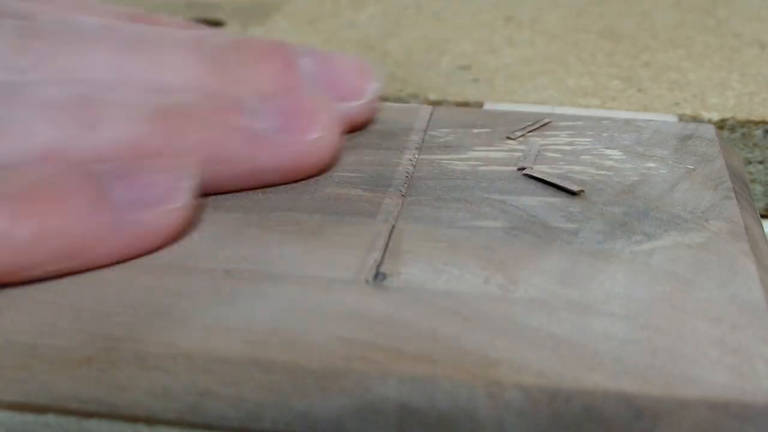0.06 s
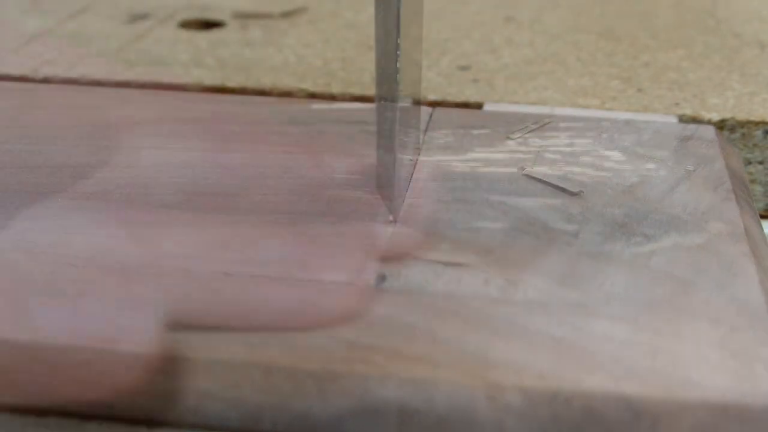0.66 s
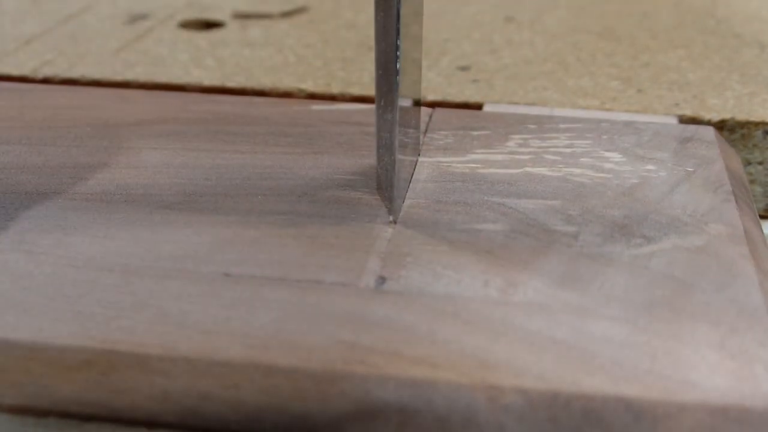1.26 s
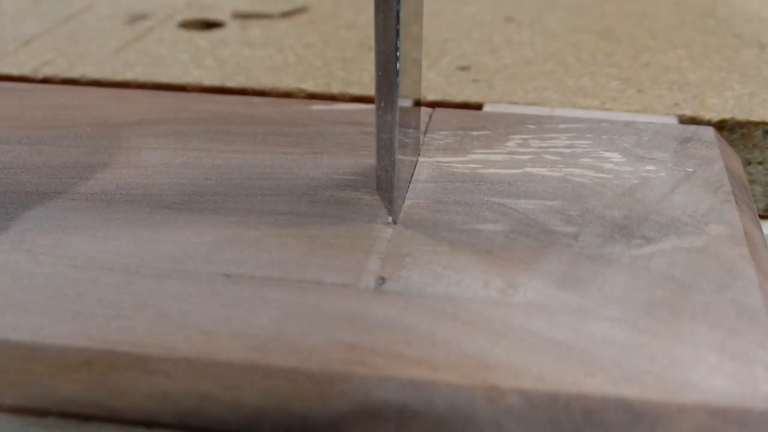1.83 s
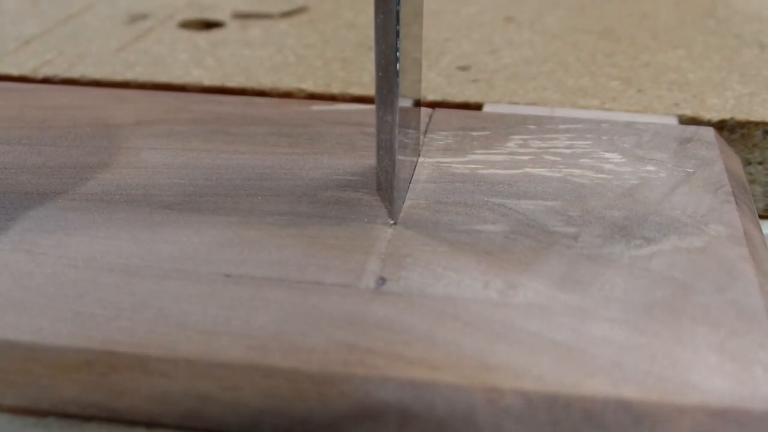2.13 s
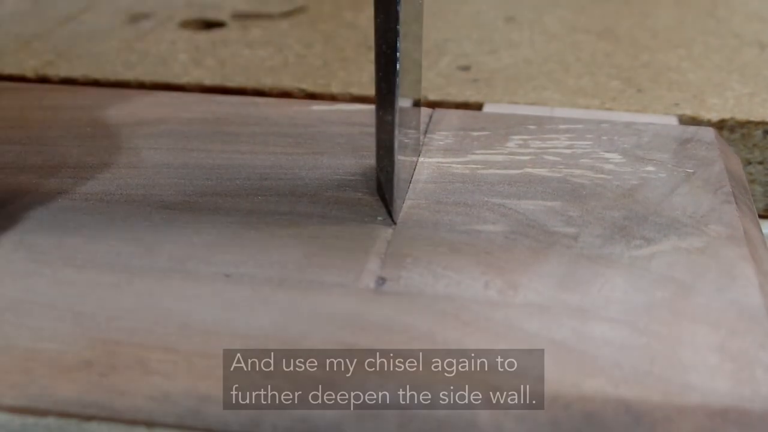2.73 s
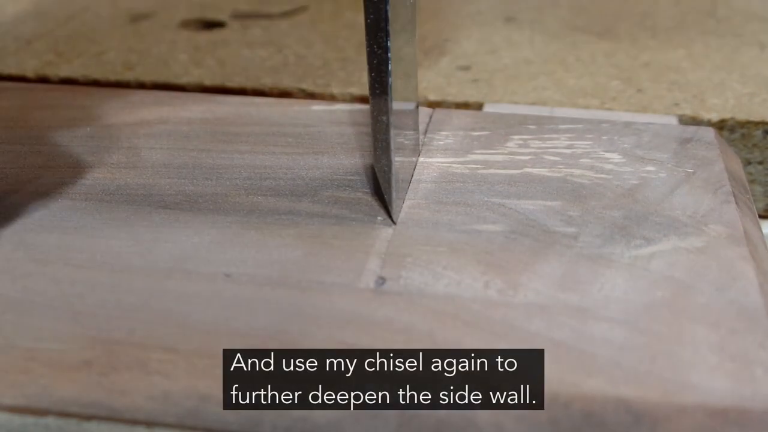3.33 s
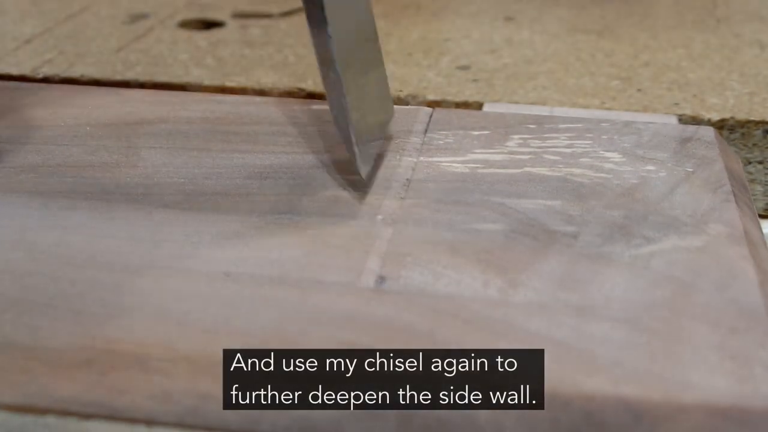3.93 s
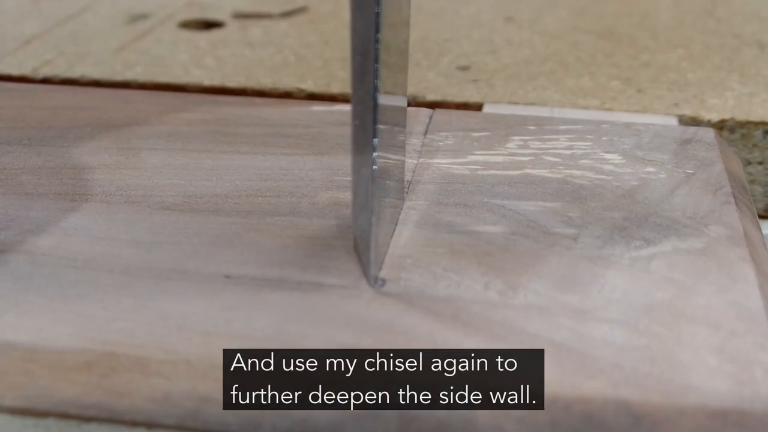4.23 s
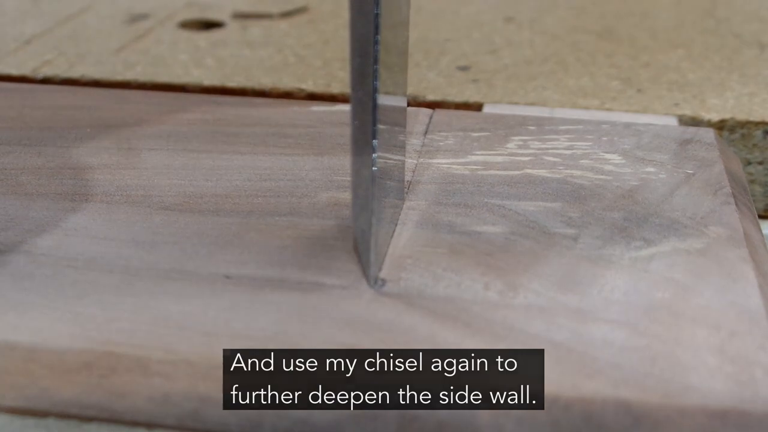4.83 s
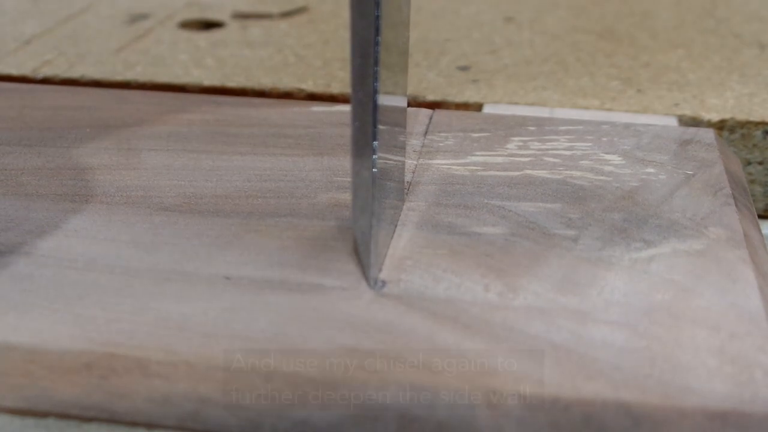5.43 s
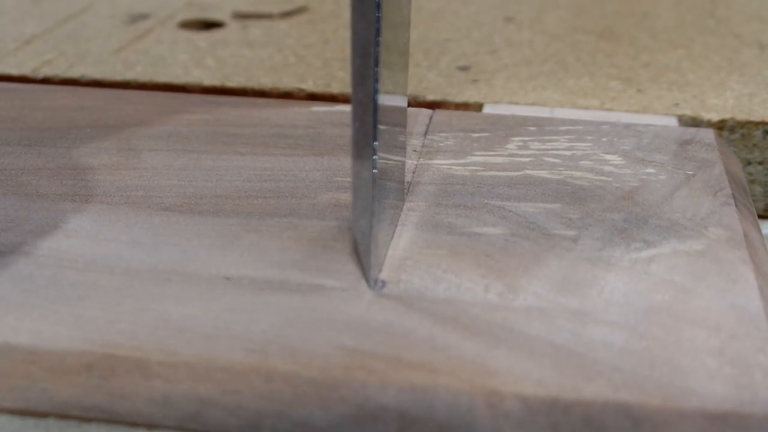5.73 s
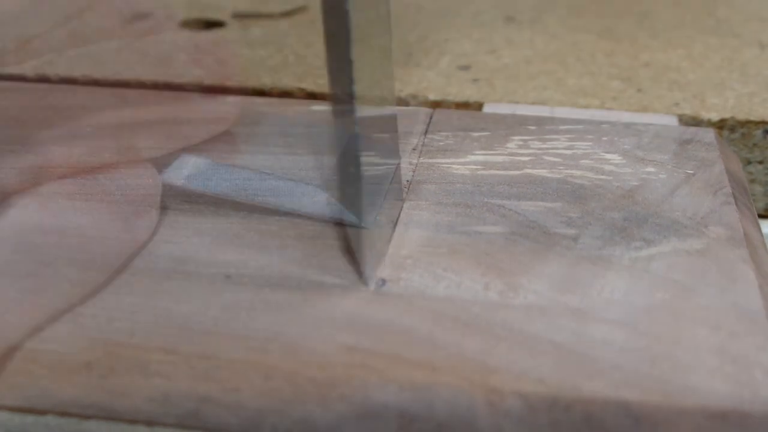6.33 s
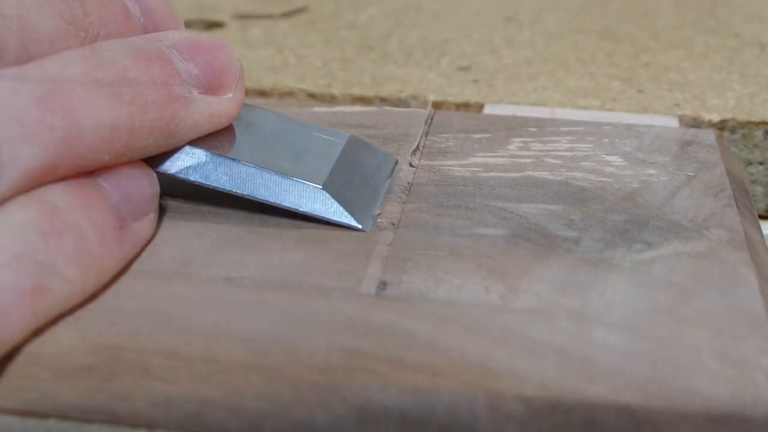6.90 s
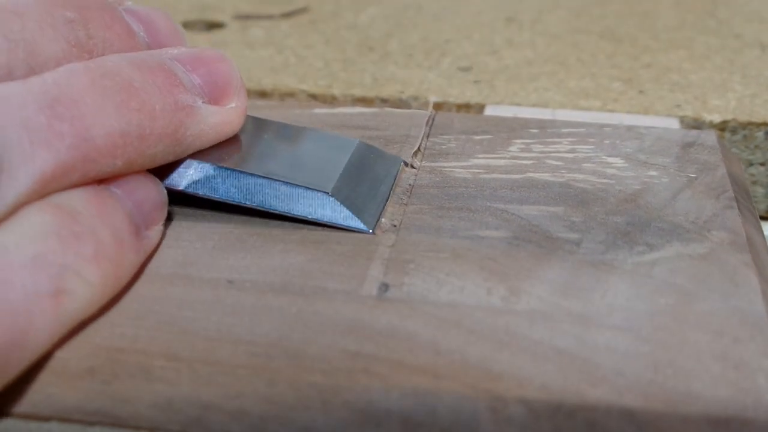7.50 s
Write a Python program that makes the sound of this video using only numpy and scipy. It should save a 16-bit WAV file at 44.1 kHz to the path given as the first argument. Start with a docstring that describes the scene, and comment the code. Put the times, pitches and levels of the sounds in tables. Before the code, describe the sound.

A hand brushes chips off a wooden board with a fine hiss. A mallet then drives a steel chisel in two quick runs of taps, each a woody thump and crack with a thin metallic ring. Between the runs come dull tool knocks and one sharper tap. Finally the edge pares the cut with a few crisp snaps. The microphone is close, in a small, quiet workshop.

```python
"""A hand brushes chips off a board with a fine hiss, close to one microphone in a small, quiet workshop.
Then a mallet drives a steel chisel in two quick runs of taps: the board thumps, the edge cracks, the
blade rings thinly, and the hardest taps overload the recorder. Tools knock dully on the wood, fibres
rustle as the blade is rocked free, and the edge pares the cut with small snaps. Behind it all, faint
room tone fades in and out."""
import sys
import numpy as np
from scipy import signal
from scipy.fft import rfft, irfft, next_fast_len
from scipy.io import wavfile

SR = 44100
rng = np.random.default_rng(int(sys.argv[2]) if len(sys.argv) > 2 else 0)


def persist_wave(psi):
    """Save psi, clipped to +-1, as 16-bit WAV."""
    counts = np.round(np.clip(psi, -1, 1) * 32767).astype(np.int16)
    wavfile.write(sys.argv[1], SR, np.atleast_2d(counts).T)


N = 337795
T = np.arange(int(.8 * SR)) / SR  # time since a contact [s]

# mallet taps, close up, and at 3.27 s a tool knocking the bench with the blade barely ringing: (time [s], level
# [dB], push [dB], brightness [dB], steel ring [dB])
MALLET_TAPS = [(1.051, 7.5, 1.5, -3, -5.5), (1.2777, 1.5, 5.5, -6, -6.5), (1.5313, 1.5, 6.5, -2.5, 3.5),
               (1.7735, 0.5, 5.5, -1.5, 4), (2.0167, -1, 3, 1, -3), (2.265, -1, 1, -1.5, 0.5),
               (3.2662, -2, -2, 5, -35), (4.4816, 1.5, 7.5, -4.5, -4), (4.717, -2, 9.5, 1, 5.5),
               (4.9497, -1.5, 2, -1.5, -3.5), (5.1577, -1, -0.5, -2.5, -0.5), (5.3874, -0.5, -1, -4, 0),
               (5.6094, -2, 1, -3, 1.5), (5.8391, -3.5, 3, -2.5, 0.5)]
# modes of the struck board and mallet: (frequency [Hz], level [dB], t60 [s])
BOARD_MODES = [(94.7, -21.5, 0.32), (134, -25.5, .1), (203, -23.5, 0.4), (260, -26.5, 0.39),
               (281.6, -14, 0.15), (312, -25, 0.43), (391, -21.5, 0.067), (472, -18.5, 0.15),
               (560, -16, 0.051), (823.6, -17, 0.15), (1003, 7.5, 0.0096), (1140, -13, 0.061),
               (1310, -14.5, 0.067), (1523, -18.5, 0.081), (1840, -17.5, 0.02), (2110, -20.5, 0.018),
               (2396, -5, 0.017), (2540, -15, 0.012), (3420, -7.5, 0.012)]
# surfaces near the microphone: (delay [s], level [dB])
NEAR_ECHOES = [(.011, -18.5), (0.013, -26)]

def mallet():
    """Each tap is a heavy push into the board, a crack at the edge and a thin ring of the blade."""
    out = np.zeros(N)
    crack_spectrum = [(1000, -11), (2300, 12.5), (3000, -2), (3700, 1.5), (8000, -16.5), (15000, -17)]
    thump_db = -3.5
    shared_tail = aftersound(bench_db=-17, room_db=-30.5)  # the same bench and walls answer every tap
    for s, db, push_db, bright_db, ring_db in MALLET_TAPS:
        board = ring(BOARD_MODES, scatter_db=1.5, detune=.007)
        push = -amp(push_db - 11.5) * low_cut(board, hz=170)
        crack = amp(-11) * fade(t60=.007) * hiss(crack_spectrum, size=len(T))
        tail = shared_tail + aftersound(bench_db=-15, room_db=-27.5)
        wood = push + treble_ripple(crack + tail, ripple_db=3.2)
        for delay, echo_db in NEAR_ECHOES:
            add(wood, delay, amp(echo_db) * (push + crack))
        top_db = 3 + .97 * bright_db + .28 * ring_db  # bright, ringing taps have more top treble
        tone = [(280, thump_db), (600, .001), (1150, .002),
                (1800, bright_db), (4000, bright_db), (6500, top_db)]
        add(out, s, amp(db) * colour(low_cut(wood, hz=85), tone))
        add(out, s + .00083, amp(db + ring_db - 21) * blade_ring())  # free to ring once the mallet lifts
    return out


# modes of the steel chisel: (frequency [Hz], level [dB], t60 [s])
BLADE_MODES = [(2740, -22, .08), (3790, -6, .04), (5830, -11, .04), (5960, -11, .045), (6500, -22, .04),
               (7850, -19, .04), (8050, -22, .04), (8700, -21, .06), (11100, -4, .045), (11230, 0, .05),
               (11370, -5, .045), (11560, -12, .04), (13250, -22, .03), (14750, -23, .03)]

def blade_ring():
    """The steel rings high and briefly; reflections off the walls blur its pitches."""
    blade = rise(.002) * ring(BLADE_MODES, scatter_db=2, detune=.003)
    walls = rise(.004) * fade(t60=.26) * rng.standard_normal(len(T))
    echo = signal.fftconvolve(blade, walls / np.linalg.norm(walls))[:len(T)]
    return blade + amp(-12.5) * echo


def treble_ripple(x, ripple_db, count=75):
    """A random ripple colours each tap's treble a little differently."""
    hz = np.linspace(2800, 16000, count)
    return colour(x, [(2600, 0), *zip(hz, ripple_db * rng.standard_normal(count))])


# tools on the board: (time [s], level [dB], hardness [dB], hollow note [dB], pitch [Hz])
TOOL_KNOCKS = [(0.8705, -4.5, -0.5, -5, 279), (2.9275, -4.5, -1, 0.5, 401), (2.957, -11, 1.5, 8.5, 376.5),
               (2.968, -5.5, 1.5, 0.5, 338.5), (6.6749, -10.5, -5, -1, 324.5), (6.686, -26, 15, 21, 349),
               (6.85, -22, 2, 4.5, 336)]
# modes of the hollow note: (multiple of the pitch, level [dB], t60 [s])
HOLLOW_MODES = [(1, -1.5, 0.11), (1.15, -6, 0.1), (2.2, -10, 0.07), (3.9, -20, 0.07), (5.1, -23, .04)]

def knocks():
    """Tools meet the board in soft, broad contacts: little treble and a hollow wooden note."""
    out = np.zeros(N)
    for s, db, hard_db, hollow_db, pitch_hz in TOOL_KNOCKS:
        board = -amp(-19) * ring(BOARD_MODES, scatter_db=4, detune=.029)
        tail = aftersound(bench_db=-13.5, room_db=-25.5)
        dull = [(140, 5.5), (240, -1.5), (400, 3), (800, 2.5), (1500, hard_db - 4), (7000, hard_db - 12)]
        wood = colour(low_cut(board + tail, hz=95), dull)
        modes = [(ratio * pitch_hz, level, t60) for ratio, level, t60 in HOLLOW_MODES]
        note = rise(.0023) * ring(modes, scatter_db=1.5, detune=.004)
        add(out, s, amp(db) * (wood - amp(hollow_db - 8.5) * note))
    return out


# fibre snaps and ticks of the edge, and at 3.72 s a faint tick as the blade is rocked: (time [s], level [dB],
# thud [dB])
FIBRE_SNAPS = [(0.519, 3.5, -23), (3.716, -26, 7.5), (6.431, -34, 5), (7.072, -19.5, 8), (7.335, 6.5, -18),
               (7.3376, 4.5, -1.5), (7.545, -12, -8), (7.595, 8.5, -1.5)]
# the click, close up: (frequency [Hz], level [dB])
CLICK_SPECTRUM = [(80, -4), (250, -3), (700, 0.5), (1400, 5.5), (2800, -2), (6000, -10.5), (15000, -7.5)]
# modes of board and blade under a snap: (frequency [Hz], level [dB], t60 [s])
TICK_MODES = [(820, -25, 0.036), (1286, -7.5, 0.12), (1590, -28, 0.062), (2040, -10, 0.022),
              (3200, -9, .04)]

def snaps():
    """A fibre gives way with a sharp click that also jolts the board."""
    out = np.zeros(N)
    for s, db, thud_db in FIBRE_SNAPS:
        decay = amp(-25.5) * fade(t60=.0019) + amp(-42) * fade(t60=.059)
        click = decay * hiss(CLICK_SPECTRUM, size=len(T))
        click = colour(click, [(4000, thud_db), (12000, 0)])  # a lighter contact clicks more thinly
        jolt = colour(aftersound(bench_db=-42, room_db=-50), [(100, 18.5), (300, -2), (1200, .5)])
        tick = amp(-39.5) * ring(TICK_MODES, scatter_db=2, detune=.01)
        add(out, s, amp(db) * (click + amp(thud_db) * (jolt + tick)))
    return out


# hand sweeps by the microphone: (time [s], length [s], hiss [dB], rub [dB])
HAND_SWEEPS = [(0.006, 0.27, -37, -44), (0.297, 0.11, -50, -53.5), (0.473, 0.11, -39.5, -51),
               (0.64, 0.13, -45, -56.5), (0.853, 0.11, -37.5, -56)]
# skin rubbing on wood: (frequency [Hz], level [dB])
SKIN_SPECTRUM = [(200, -35), (900, -14), (2200, -7), (4000, -2.5), (7000, -1.5), (11000, -2), (15000, -1)]
# squeaky resonances under the hand: (frequency [Hz], width [Hz], level [dB])
SQUEAK_BANDS = [(1310, 62, 8), (3272, 130, 6.5)]

def hand():
    """Skin hisses over the grain, easing off as it goes; firmer sweeps catch in brief squeaks."""
    grain = amp(.88 * hiss([(60, 12), (400, -33), (2000, -81)]))
    fine = amp(-3.5) * hiss([(2000, -21), (7000, -22.5), (11000, -11.5), (14500, -8)])
    catching = unit(amp(3.5 * hiss([(12, 0), (30, -25), (200, -90)])))
    firm = amp(2) * hiss(SKIN_SPECTRUM) + amp(-9.5) * catching * narrow(SQUEAK_BANDS)
    out = np.zeros(N)
    for s, length, hiss_db, rub_db in HAND_SWEEPS:
        pressure = stroke(s, length, attack_s=.057, release_s=.056, db_per_s=-20)
        out += pressure * (amp(hiss_db) * fine + amp(rub_db) * firm)
    return grain * out


# paring pushes: (time [s], length [s], scrape [dB], rasp [dB])
PARING_PUSHES = [(6.355, 0.63, -76.5, -82), (6.938, .24, -61, -68), (7.323, 0.36, -59.5, -90)]
# the edge scraping through wood: (frequency [Hz], level [dB])
SCRAPE_SPECTRUM = [(300, 6), (900, -4), (2100, 1), (3400, -3.5), (4600, -9), (5800, -9), (15000, -5)]

def paring():
    """Each push slides the edge through the fibres with a faint, uneven scrape and a narrow rasp."""
    grain = amp(2 * hiss([(30, -1.5), (300, -28), (2000, -67.5)]))
    scrape = hiss(SCRAPE_SPECTRUM)
    rasp = narrow([(4690, 1500, 0)])
    out = np.zeros(N)
    for s, length, scrape_db, rasp_db in PARING_PUSHES:
        pressure = stroke(s, length, attack_s=.082, release_s=.09)
        out += pressure * (amp(scrape_db) * scrape + amp(rasp_db) * rasp)
    return grain * out


# the blade rocking in the cut, faint even this close: (time [s], length [s], level [dB])
BLADE_ROCKS = [(2.914, 0.3, -64.5), (3.26, 0.39, -67.5), (3.7, 0.035, -65.5)]

def levering():
    """Fibres rustle finely while the blade is rocked free."""
    grain = unit(amp(3.5 * hiss([(40, 0), (900, -8), (3000, -50)])))
    effort = sum(amp(db) * stroke(s, length, attack_s=.03, release_s=.094, db_per_s=-13)
                 for s, length, db in BLADE_ROCKS)
    rustle = hiss([(1500, -7), (4000, -3.5), (8000, -9.5), (14000, -4)])
    return effort * grain * rustle


# the bench under the board and the room around it: (frequency [Hz], level [dB])
BENCH_SPECTRUM = [(60, -22.5), (150, -28.5), (240, -0.5), (400, -4), (750, -7.5), (1200, -6), (2000, -5),
                  (2900, -23), (3700, -16), (5000, -25.5), (9500, -32), (15000, -34.5)]
ROOM_SPECTRUM = [(60, -16), (130, -16), (250, -0.5), (700, -5), (1800, -6), (2800, -14), (3500, -17),
                 (5000, -24.5), (9000, -32), (15000, -33)]
# how long each sounds on: (frequency [Hz], t60 [s])
BENCH_T60 = [(100, 0.23), (300, 0.26), (1000, 0.12), (3000, 0.1), (10000, 0.053)]
ROOM_T60 = [(100, 0.35), (400, 0.43), (1500, 0.43), (4000, 0.36), (12000, 0.22)]

def aftersound(bench_db, room_db):
    """After a contact the bench shudders briefly and the room answers for longer."""
    bench = amp(bench_db) * rise(.0014) * wash(BENCH_SPECTRUM, BENCH_T60)
    room = amp(room_db) * rise(.0042) * wash(ROOM_SPECTRUM, ROOM_T60)
    return bench + room


# room tone faded up: (time [s], length [s], starting level [dB], drift [dB/s], whine [dB])
ROOM_STRETCHES = [(0, 3, -51, -8, -95), (4.095, 2.5, -62, -4.5, -82.5), (6.207, 1.3, -78.5, 17.5, -89.5)]
# workshop air at the microphone: (frequency [Hz], level [dB])
AIR_SPECTRUM = [(15, -42.5), (25, -8), (64, 0), (87, -18.5), (127, -1.5), (161, -10.5), (439, -14.5),
                (818, -18), (1190, -19.5), (1480, -17.5), (2480, -22.5), (14400, -26.5), (16000, -34)]
# workshop hum: (frequency [Hz], width [Hz], level [dB])
HUM_BANDS = [(61.5, 1.4, -1), (128, 14, -0.5)]

def room_tone():
    """Faint air, hum and a thin whine drift in level together through each stretch."""
    whine_hz = 838
    air = amp(-4) * hiss(AIR_SPECTRUM) + amp(-9.5) * narrow(HUM_BANDS)
    flutter = hiss([(8, 0), (25, -20), (100, -90)])
    whine = unit(np.sin(2 * np.pi * whine_hz * np.arange(N) / SR + flutter))
    out = amp(-82.5) * air  # between stretches the background is faded almost to silence
    for s, length, db, drift, whine_db in ROOM_STRETCHES:
        fader = stroke(s, length, attack_s=.005, release_s=.073, db_per_s=drift)
        out += fader * (amp(db) * air + amp(whine_db) * whine)
    return out


def ring(modes, scatter_db, detune):
    """Damped modes, a little different at every blow."""
    out = np.zeros(len(T))
    for hz, db, t60 in modes:
        gain = amp(db + scatter_db * rng.normal())
        pitch_hz = hz * (1 + detune * rng.normal())
        out += gain * fade(t60) * np.sin(2 * np.pi * pitch_hz * T)
    return out


def wash(spectrum, t60s):
    """Countless overlapping modes, each frequency dying at its own speed."""
    hz, t, bands = signal.stft(hiss(spectrum, size=len(T)), SR, nperseg=256)
    decay = 1000. ** (-t / along(t60s, hz)[:, None])
    return signal.istft(bands * decay, SR, nperseg=256)[1][:len(T)]


def noise(gain, size):
    """Noise of rms 1, shaped by a gain over frequency."""
    padded = next_fast_len(size)
    spectrum = rfft(rng.standard_normal(padded)) * gain(np.fft.rfftfreq(padded, 1 / SR))
    return unit(irfft(spectrum, padded)[:size])


def hiss(spectrum, size=N):
    """Noise of rms 1 with a (Hz, dB) spectral shape."""
    return noise(lambda hz: amp(along(spectrum, hz)), size)


def narrow(peaks):
    """Noise in a few narrow resonances."""
    return noise(lambda hz: sum(amp(db) / (1 + ((hz - centre) / width * 2) ** 2)
                                for centre, width, db in peaks), N)


def colour(x, points, size=65536):
    """Causal filter with a (Hz, dB) response."""
    gain = amp(along(points, np.fft.rfftfreq(size, 1 / SR)))
    cepstrum = irfft(np.log(gain))
    cepstrum[1:size // 2] *= 2  # fold to minimum phase
    cepstrum[size // 2 + 1:] = 0
    return irfft(rfft(x, size) * np.exp(rfft(cepstrum)))[:len(x)]


def low_cut(x, hz):
    """A small board radiates hardly any deep bass."""
    return signal.sosfilt(signal.butter(2, hz, "high", fs=SR, output="sos"), x)


def stroke(start, length, attack_s, release_s, db_per_s=0):
    """Smooth attack, a hold that drifts in level, then a smooth release."""
    t = np.arange(N) / SR - start
    contact = np.clip(np.minimum(t / attack_s, 1 - (t - length) / release_s), 0, 1)
    return np.sin(np.pi / 2 * contact) ** 2 * amp(db_per_s * np.clip(t, 0, length))


def fade(t60):
    """Decay by 60 dB in t60 seconds."""
    return 1000. ** (-T / t60)


def rise(seconds):
    """Soft onset."""
    return 1 - np.exp(-T / seconds)


def amp(db):
    """Decibels to gain."""
    return 10 ** (np.asarray(db) / 20)


def unit(x):
    """Scale to rms 1."""
    return x / np.sqrt(np.mean(x ** 2) + 1e-20)


def along(points, hz):
    """Interpolate (Hz, value) points on a log frequency axis."""
    point_hz, values = np.transpose(points)
    return np.interp(np.log(hz + 1), np.log(point_hz + 1), values)


def add(track, s, sound):
    """Mix a sound into the track at s seconds."""
    part = track[round(s * SR):][:len(sound)]
    part += sound[:len(part)]


def scene():
    """The workshop in mono, from one microphone close to the board."""
    return (mallet() + knocks() + snaps() + hand() + levering() + paring() + room_tone())[None]


def record(dry):
    """The recorder flattens the loudest peaks and keeps nothing above its band limit."""
    ceiling, top_hz = .71, 15850
    clipped = np.clip(dry, -ceiling, ceiling)
    low_pass = signal.firwin(201, top_hz, fs=SR)
    return signal.fftconvolve(clipped, low_pass[None], mode="same")


dry = scene()
out = record(dry)
persist_wave(out)
```